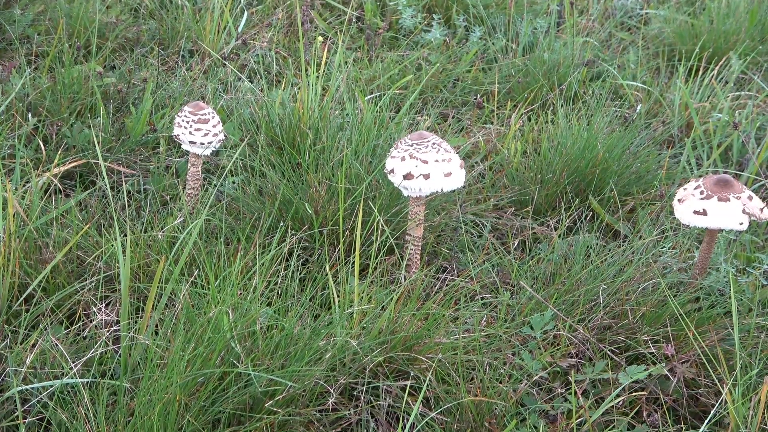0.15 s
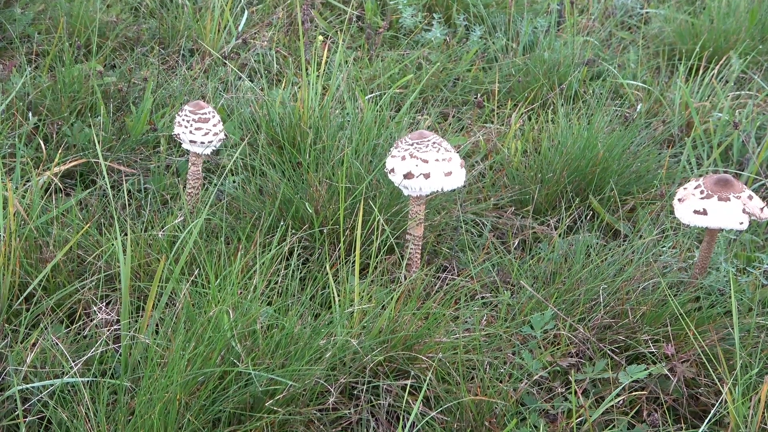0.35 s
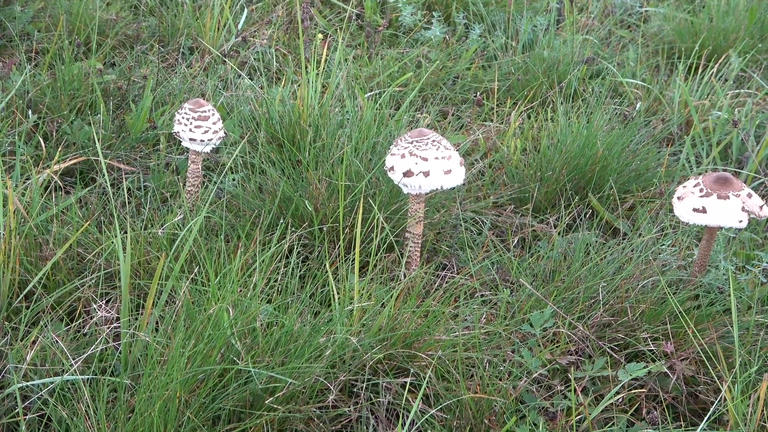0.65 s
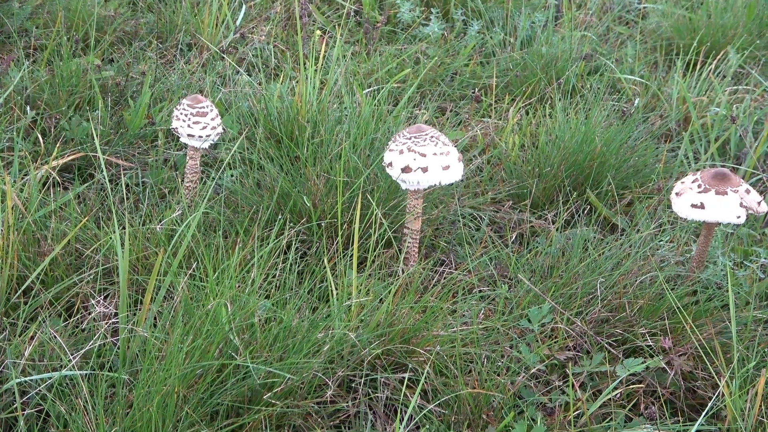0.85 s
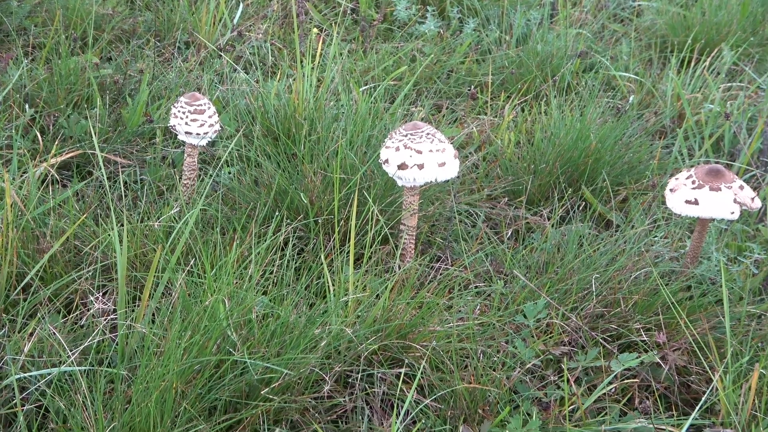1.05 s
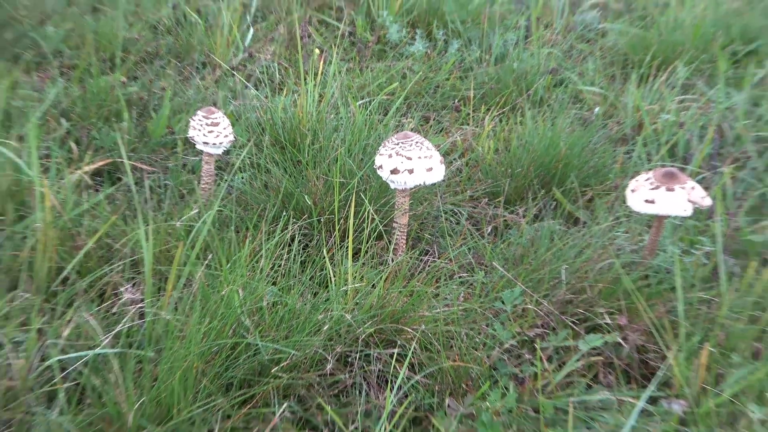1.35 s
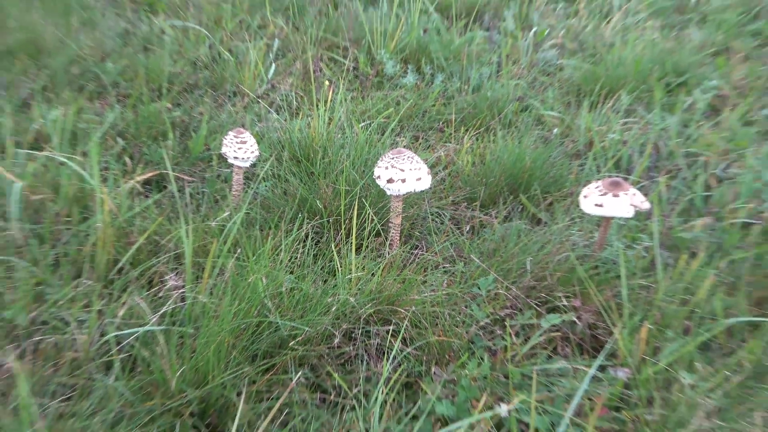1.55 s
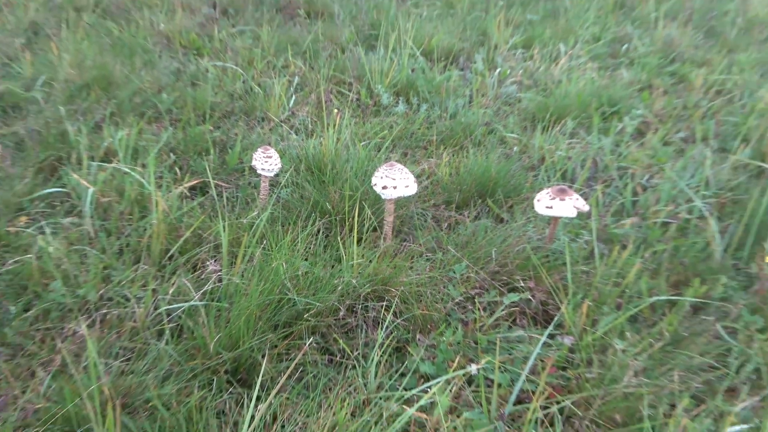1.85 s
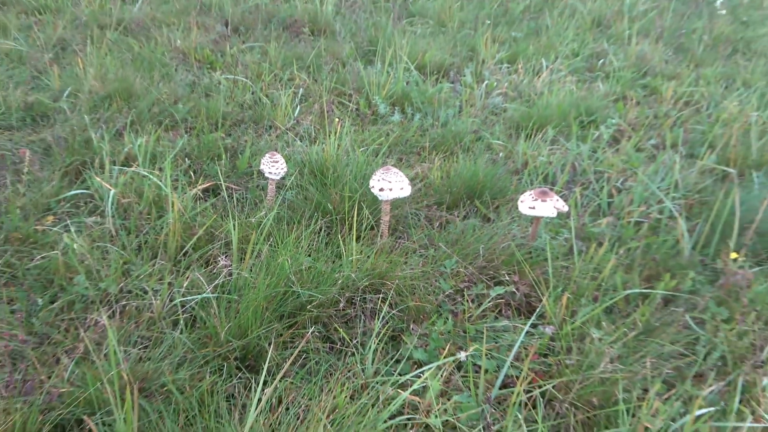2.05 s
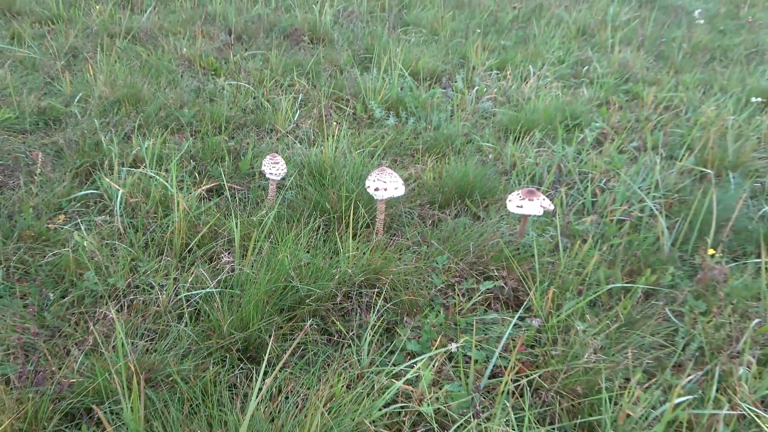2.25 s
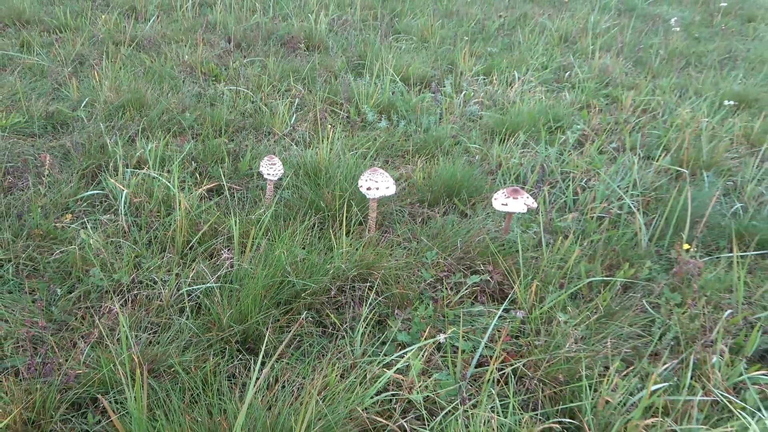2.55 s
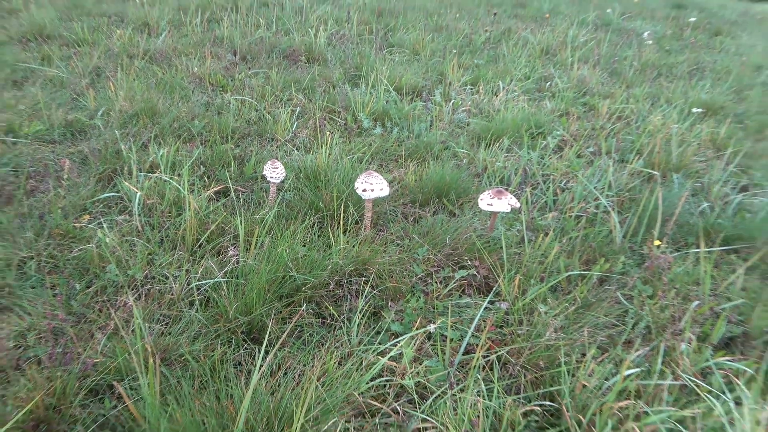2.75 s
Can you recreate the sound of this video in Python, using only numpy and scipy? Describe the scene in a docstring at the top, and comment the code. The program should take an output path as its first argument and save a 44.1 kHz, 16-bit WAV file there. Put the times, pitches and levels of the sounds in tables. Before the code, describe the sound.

A deer gives three short, throaty groans about a second apart, to the right of the microphone. Each is a rough rattle that speeds up and slows, with a brief echo over the faint low murmur of a meadow.

```python
"""A fallow buck groaning in a meadow

A rutting buck groans three times, to the right of the listener. Each groan is a slow rattle:
his vocal folds slap shut again and again, and every slap rings his long throat. The rattle
speeds up, turns rough and slows again, and the ground and trees scatter it. Underneath lie
a low distant murmur of the land, a wavering hum, soft air, a thin hiss and a faint whine."""
import sys
import numpy as np
from scipy import signal
from scipy.fft import rfft, irfft, next_fast_len
from scipy.io import wavfile
from scipy.ndimage import map_coordinates

SR = 44100
rng = np.random.default_rng(int(sys.argv[2]) if len(sys.argv) > 2 else 0)


def unload_wav(signal):
    """Save mono or channel-first audio to the path in sys.argv[1] as 16-bit WAV at rate SR, clipped to [-1, 1]."""
    wavfile.write(
        sys.argv[1],
        SR,
        np.round(np.clip(np.atleast_2d(signal).T, -1, 1) * 32767).astype(np.int16),
    )


N = 127890
PULSE_TIME = np.arange(int(SR * .12)) / SR  # seconds within one throat pulse
BOOM_WINDOW_S, RASP_WINDOW_S = .025, .012  # lengths that set the energy of low and high pulses
THROAT_SCATTER = .013  # pitches stray by about this fraction from pulse to pulse

# Left-right balance of the buck, the murmur and the hum: pitch_hz, left_minus_right_db
BALANCE = [(60, 10), (99, -2), (160, 1.5), (270, 1.5), (450, -3.5), (740, -9), (1220, -12.5), (2010, -9),
           (3330, -6.5), (5500, -3.5), (9080, -2), (15000, -6)]


def amp(db):
    """Turn decibels into a gain."""
    return 10 ** (np.asarray(db) / 20)


def along(points, hz):
    """Read a value between rows of pitch_hz, value, on a logarithmic pitch scale."""
    pitches, values = np.transpose(points)
    return np.interp(np.log(hz + 1), np.log(pitches + 1), values)


def level(rows):
    """A gain for every sample, from rows of time_s, level_db."""
    return amp(np.interp(np.arange(N) / SR, *np.transpose(rows)))


def decay(t, fade_s):
    """A fade that falls by 60 dB in fade_s seconds."""
    return np.exp(-np.log(1000) * t / fade_s)


def filtered(x, response):
    """Weight each frequency of x by response(hz)."""
    length = x.shape[-1]
    padded = next_fast_len(length + 8192)
    return irfft(rfft(x, padded) * response(np.fft.rfftfreq(padded, 1 / SR)), padded)[..., :length]


def band(x, low_hz, high_hz, order):
    """Keep what lies between two frequencies."""
    return signal.sosfilt(signal.butter(order, [low_hz, high_hz], "band", fs=SR, output="sos"), x)


def noise(spectrum, size):
    """Noise of average power 1, shaped by rows of pitch_hz, level_db."""
    shaped = filtered(rng.standard_normal(size), lambda hz: amp(along(spectrum, hz)))
    return shaped / np.sqrt(np.mean(shaped ** 2) + 1e-20)


def sized(x, db, window_s=RASP_WINDOW_S):
    """Give a pulse the energy of a steady sound of this level and length."""
    return amp(db) * x * np.sqrt(window_s * SR / np.sum(x ** 2))


def widen(pair, spread):
    """Mix two unrelated signals into a left and right; less spread makes them more alike."""
    return (pair[0] + spread * np.array([pair[1], -pair[1]])) / np.hypot(1, spread)


def place(x, balance):
    """Sound from the right reaches the left ear later; balance shares each pitch between the ears."""
    # How much later the left ear hears it: pitch_hz, delay_s
    left_lag = [(60, .0004), (130, .00055), (215, .0008), (540, .0007), (1030, .00046), (2200, .00039)]
    side = np.array([[.5], [-.5]])
    def response(hz):
        gain = amp(side * along(balance, hz))
        delay = np.exp(-2j * np.pi * hz * side * along(left_lag, hz))
        return gain / np.sqrt(np.mean(gain ** 2, 0)) * delay
    return filtered(x, response)


def murmur():
    """The distant land: low noise that swells and sinks."""
    # Tone of the murmur: pitch_hz, level_db
    spectrum = [(20, -1), (40, -16), (65, -11), (85, -7.5), (110, -0.5), (135, 6), (170, -3), (235, -7.5),
                (285, -17), (400, -23.5), (900, -49.5)]
    # Its rise and fall: time_s, level_db
    loudness = [(0, -47), (.3, -50), (.6, -42), (.73, -49), (.86, -52.5), (1.0, -49), (1.3, -48.5),
                (1.62, -47), (1.78, -48), (2.0, -47.5), (2.6, -44.5), (2.8, -47), (2.9, -56)]
    return place(level(loudness) * widen(noise(spectrum, size=(2, N)), spread=0.089), BALANCE)


def hum(pitch_hz=119.2):
    """A low tone that comes and goes, wavering slightly in pitch."""
    # Its rise and fall: time_s, level_db
    loudness = [(0, -63), (.4, -41), (.9, -62.5), (1.35, -79), (1.58, -41), (1.74, -49), (1.9, -45),
                (2.1, -59), (2.9, -58)]
    # A smooth curve through ten random values a second.
    waver = map_coordinates(rng.standard_normal(40), [np.arange(N) * 10 / SR])
    cycles = np.cumsum(pitch_hz * (1 + 0.017 * waver)) / SR
    return place(level(loudness) * np.sqrt(2) * np.sin(2 * np.pi * cycles), BALANCE)


def air():
    """Soft air: steady noise, mostly in the middle pitches."""
    # Tone of the air: pitch_hz, level_db
    spectrum = [(200, -11), (350, -2), (460, -3.5), (600, -1.5), (720, -3.5), (870, 0), (950, -7.5),
                (1030, 1.5), (1150, -9), (1450, -8), (2100, -5.5), (2800, -11), (3600, -17), (5000, -22),
                (8000, -30.5), (11000, -48)]
    # Where it sits: pitch_hz, left_minus_right_db
    balance = [(350, 5), (600, -6.5), (2000, -9), (3500, -5), (5000, -14.5), (8000, -9.5)]
    return place(amp(-55.5) * widen(noise(spectrum, size=(2, N)), spread=0.54), balance)


def hiss():
    """Thin, high noise that gently swells and fades."""
    # Tone of the hiss: pitch_hz, level_db
    spectrum = [(4500, -13.5), (6500, -11), (7400, -11.5), (8600, -15.5), (9500, -4), (10900, -4),
                (12400, -9.5), (13700, -36), (15500, -37)]
    # Its rise and fall: time_s, level_db
    loudness = [(0, -64.5), (.13, -65.5), (.45, -60), (.7, -62), (.87, -66), (1.15, -65), (1.45, -61),
                (1.7, -64), (2.0, -65.5), (2.25, -61), (2.52, -60.5), (2.9, -67.5)]
    # Where it sits: pitch_hz, left_minus_right_db
    balance = [(8000, 5.5), (9600, 3.5), (11000, -10), (12500, -8), (14000, 29)]
    return place(level(loudness) * widen(noise(spectrum, size=(2, N)), spread=0.66), balance)


def whine(pitch_hz=5400, level_db=-82):
    """A faint, steady high tone, the same in both ears."""
    return amp(level_db) * np.sqrt(2) * np.sin(2 * np.pi * pitch_hz * np.arange(N) / SR)


def slap(rate_hz, calm_rate_hz=23.8):
    """One slap of the vocal folds and its puff of air; a fast rattle makes it longer and rougher."""
    haste_hz = max(rate_hz - calm_rate_hz, 0)
    rough_db = -1.5 + 0.44 * haste_hz
    puff = rng.standard_normal(len(PULSE_TIME)) * decay(PULSE_TIME, fade_s=.018 + .0016 * haste_hz)
    push = (PULSE_TIME == 0) + amp(rough_db) * puff / np.linalg.norm(puff)
    # The folds part raggedly, so a weaker slap follows.
    second_slap_s = rng.uniform(.003, .006)
    push[int(second_slap_s * SR)] += amp(rough_db - 5.5)
    return push


def ring(tones, tuning, scatter):
    """Throat tones struck once; tuning multiplies their pitches and scatter detunes them at random."""
    hz, db, fade_s = np.transpose(tones)[:, :, None]
    detune, strength = rng.standard_normal((2, len(tones), 1))
    sign = (-1) ** np.arange(len(tones))[:, None]
    waves = sign * np.sin(2 * np.pi * hz * tuning * (1 + scatter * detune) * PULSE_TIME)
    return np.sum(waves * amp(db + 3 * strength) * decay(PULSE_TIME, fade_s), 0)


def boom(level_db, late_s):
    """The deepest ring of the throat, which climbs in pitch as the groan goes on."""
    # Low throat tones: base_pitch_hz, relative_db, fade_s
    tones = [(137, 0, 0.066), (166.5, -8, 0.063), (221.3, 3, 0.1)]
    return sized(ring(tones, 1 + 0.24 * late_s, THROAT_SCATTER), level_db, BOOM_WINDOW_S)


def hollow_ring(level_db, late_s, fade_db_per_s=27.5):
    """A hollow ring just above the boom, strongest early in the groan."""
    # Hollow throat tones: base_pitch_hz, relative_db, fade_s
    tones = [(315, -15, 0.076), (365.3, 7, 0.13)]
    return sized(ring(tones, tuning=0.94, scatter=0), level_db - fade_db_per_s * late_s, BOOM_WINDOW_S)


def rasp(push, rasp_db, edge_db, snap_db, late_s):
    """A slap rings three groups of high tones, which sink as the throat lengthens."""
    # The rasp, its bright edge and its high snap, each: base_pitch_hz, relative_db, fade_s
    rasp_tones = [(1795, 2.5, 0.019), (1987, 0, 0.018), (2193, -0.5, 0.02)]
    edge_tones = [(2600, -7.5, 0.019), (2785, 2.5, 0.018), (3028, -2, 0.013)]
    snap_tones = [(4380, -4, 0.0073), (4780, 3, 0.011), (5810, -3.5, 0.0064)]
    out = np.zeros(len(PULSE_TIME))
    for tones, low_hz, high_hz, level_db in ((rasp_tones, 1746, 2610, rasp_db),
                                             (edge_tones, 1980, 3220, edge_db),
                                             (snap_tones, 3500, 5400, snap_db)):
        throat = ring(tones, 1 - 0.025 * late_s, THROAT_SCATTER)
        struck = signal.fftconvolve(push, throat)[:len(PULSE_TIME)]
        out += sized(band(struck, low_hz, high_hz, order=2), level_db)
    return out


def lingering_ring(push, level_db, tuning, late_s, grow_db_per_s=17):
    """Clear throat tones that ring on after a slap and stand out more as the groan goes on."""
    # Long-ringing tones: base_pitch_hz, relative_db, fade_s
    tones = [(1766, 0, 0.07), (1889, 7, 0.082), (2240, 1, 0.067), (2590, -7.5, 0.16), (2720, 2.5, 0.14)]
    struck = signal.fftconvolve(push, ring(tones, tuning, scatter=0))[:len(PULSE_TIME)]
    return sized(struck, level_db + grow_db_per_s * late_s)


def vowel(level_db, tuning):
    """The throat's middle tones make a hollow vowel, nearly the same from pulse to pulse."""
    # Vowel tones: base_pitch_hz, relative_db, fade_s
    tones = [(533.5, -2.5, 0.12), (615.5, -6, 0.093), (820, -9.5, 0.071), (1039, 1.5, .19), (1127, 1, 0.06),
             (1257, 0.5, 0.068), (1378, -1.5, 0.026)]
    return sized(ring(tones, tuning, scatter=0.0029), level_db)


def crack(level_db):
    """The short, bright burst of noise that starts a hard pulse."""
    # Tone of the crack: pitch_hz, level_db
    spectrum = [(2000, -18), (3500, 7), (4800, -2), (5700, -4.5), (6400, -23), (7600, -10), (9000, -16)]
    return sized(noise(spectrum, len(PULSE_TIME)) * decay(PULSE_TIME, fade_s=0.017), level_db)


def breath(level_db):
    """Air rushes through the throat with each pulse."""
    # Tone of the rushing air: pitch_hz, level_db
    spectrum = [(1500, -37), (3300, 10.5), (3900, 7), (5500, -6), (6400, -11.5), (7600, -6), (8700, -20),
                (12000, -28)]
    return sized(noise(spectrum, len(PULSE_TIME)) * decay(PULSE_TIME, fade_s=0.082), level_db)


def groan(speeds, strengths):
    """The folds slap once a cycle and ring the throat; returns the boom and the sound above it."""
    speed_times, rates_hz = np.transpose(speeds)
    strength_times, *levels = np.transpose(strengths)
    t = np.arange(speed_times[0], speed_times[-1], 1 / SR)
    cycles = np.cumsum(np.interp(t, speed_times, rates_hz)) / SR
    pulse_starts = np.interp(np.arange(int(cycles[-1]) + 1), cycles, t)
    out = np.zeros((2, N + SR))
    for start_s in pulse_starts:
        boom_db, rasp_db, edge_db, snap_db = (np.interp(start_s, strength_times, db) for db in levels)
        effort_db = (rasp_db + edge_db) / 2
        late_s = start_s - speed_times[0] - 0.21  # negative early in the groan, positive later
        tuning = 1 - 0.062 * late_s  # the throat lengthens, so its tones sink
        push = slap(np.interp(start_s, speed_times, rates_hz))
        low = boom(boom_db - 1, late_s)
        upper = hollow_ring(boom_db - 19, late_s)
        upper += rasp(push, rasp_db - 1, edge_db - 0.5, snap_db - 2, late_s)
        upper += lingering_ring(push, effort_db - 6, tuning, late_s)
        upper += vowel((boom_db + effort_db) / 2 - 10, tuning)
        upper += crack(snap_db - 6)
        upper += breath(effort_db - 18)
        first = round(start_s * SR)
        out[:, first:first + len(PULSE_TIME)] += [low, upper]
    return out[:, :N]


def echoed(x, echo_db, spread, rise_s=0.0055):
    """Add the short tail of sound that the ground and trees scatter back."""
    # How long the echo lasts: pitch_hz, fade_s
    fade_times = [(120, 0.41), (250, 0.28), (1000, 0.67), (2200, 0.27), (3200, 0.35), (5000, 0.23)]
    hz, t, spectra = signal.stft(rng.standard_normal((2, SR // 2)), SR, nperseg=256)
    envelope = decay(t, along(fade_times, hz)[:, None]) * (1 - np.exp(-t / rise_s))
    tail = widen(signal.istft(spectra * envelope, SR)[1], spread)
    tail /= np.linalg.norm(tail[0])
    return x + amp(echo_db) * signal.fftconvolve(x[None], tail, axes=1)[:, :N]


def buck():
    """Three groans from the right, starting about a second apart, with their echo."""
    # Speed of the rattle in each groan: time_s, pulses_per_s
    speed_1 = [(0.181, 17.48), (0.279, 23.58), (0.325, 18.71), (0.406, 30.87), (0.47, 33.04),
               (0.634, 15.36), (0.723, 9.36)]
    speed_2 = [(1.067, 19.64), (1.172, 18.02), (1.226, 20.23), (1.324, 20.32), (1.368, 25.23),
               (1.543, 20.39), (1.61, 14.22)]
    speed_3 = [(2.032, 20.3), (2.11, 18.4), (2.18, 24.2), (2.222, 24.44), (2.256, 35.14), (2.28, 35.5),
               (2.36, 27), (2.395, 32.5), (2.43, 23.8), (2.454, 25.48), (2.485, 34.27), (2.531, 12.34),
               (2.584, 23.09), (2.651, 11.74)]
    # Strength of the parts of each groan: time_s, boom_db, rasp_db, edge_db, snap_db
    strength_1 = [(0.181, -43.5, -59, -59.5, -75), (0.233, -39, -45, -44.5, -61.5),
                  (0.279, -31, -32.5, -41.5, -72), (0.325, -34.5, -54, -34, -57),
                  (0.371, -26.5, -38, -40.5, -52.5), (0.406, -27.5, -31.5, -39.5, -54),
                  (0.5, -40, -36, -39, -53.5), (0.537, -34, -34, -44.5, -54.5),
                  (0.63, -54, -46.5, -58, -68), (0.713, -41, -55, -67, -81)]
    strength_2 = [(1.067, -50, -61.5, -80, -75), (1.173, -42, -47.5, -56.5, -81),
                  (1.228, -33.5, -48, -49, -73), (1.325, -27, -33.5, -48.5, -55.5),
                  (1.368, -26, -43.5, -41.5, -59.5), (1.409, -24, -36, -45.5, -53),
                  (1.497, -27.5, -37.5, -37, -66), (1.543, -40.5, -42.5, -52, -62),
                  (1.6, -39.5, -52, -48.5, -69)]
    strength_3 = [(2.032, -47, -56.5, -62, -66), (2.083, -41.5, -41.5, -47, -57.5),
                  (2.136, -33.5, -37.5, -50.5, -61), (2.18, -28.5, -32, -39, -65),
                  (2.283, -30, -36.5, -40, -55), (2.346, -29.5, -31.5, -42.5, -54),
                  (2.383, -29.5, -33, -46, -48), (2.412, -31, -34.5, -38, -55.5),
                  (2.485, -33.5, -38, -44, -56.5), (2.584, -44, -55, -60, -73), (2.64, -43, -46, -68, -72)]
    low, upper = groan(speed_1, strength_1) + groan(speed_2, strength_2) + groan(speed_3, strength_3)
    low = echoed(band(low, low_hz=109.6, high_hz=223.3, order=3), echo_db=-5, spread=0.45)
    upper = echoed(band(upper, low_hz=248, high_hz=10400, order=4), echo_db=-3, spread=0.31)
    return place(low + upper, BALANCE)


def scene():
    """The buck over the quiet sounds of the meadow."""
    return buck() + murmur() + hum() + air() + hiss() + whine()


def record(dry, top_hz=15650):
    """Cut away the very highest treble."""
    return filtered(dry, lambda hz: hz < top_hz)


dry = scene()
out = record(dry)
unload_wav(out)
```